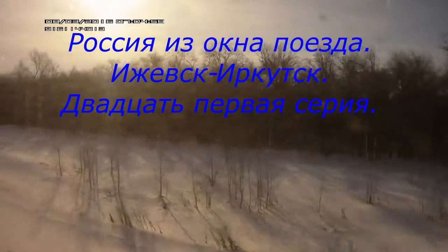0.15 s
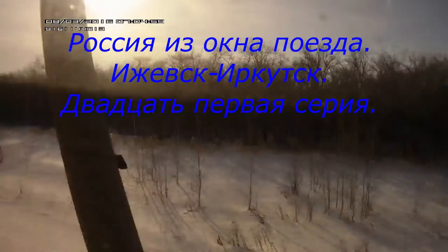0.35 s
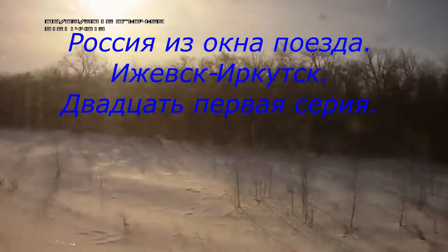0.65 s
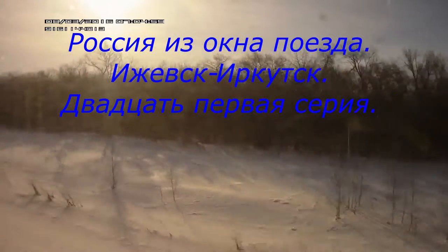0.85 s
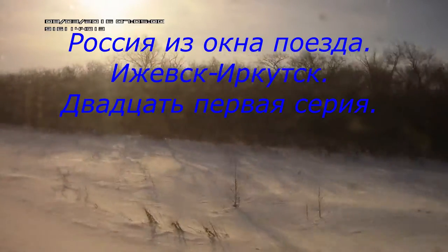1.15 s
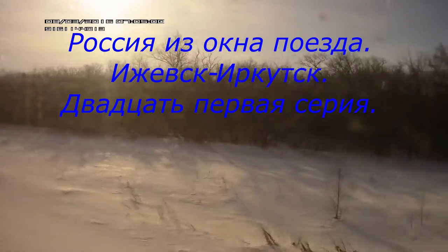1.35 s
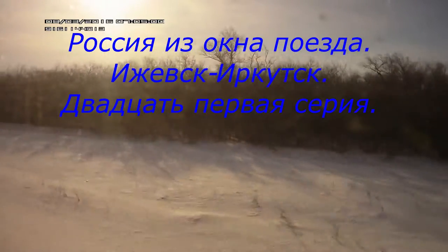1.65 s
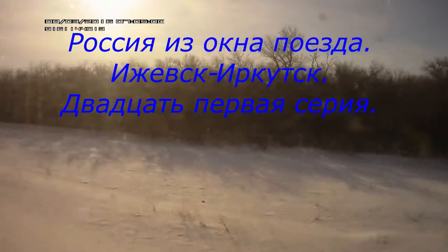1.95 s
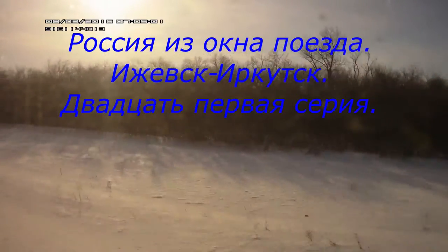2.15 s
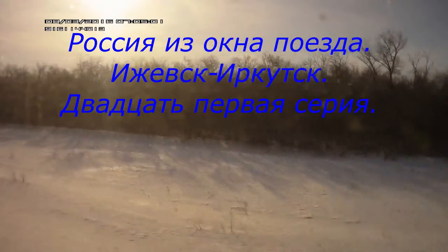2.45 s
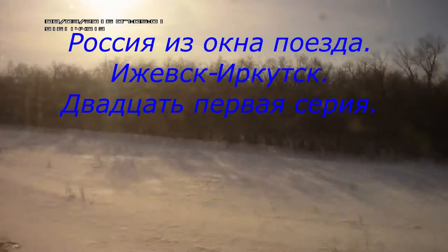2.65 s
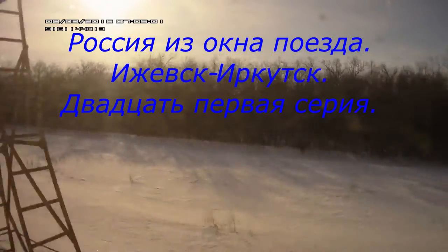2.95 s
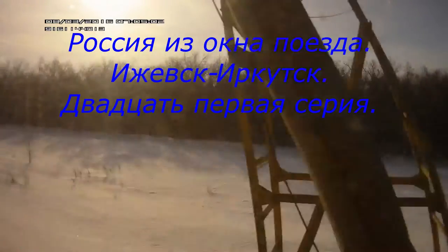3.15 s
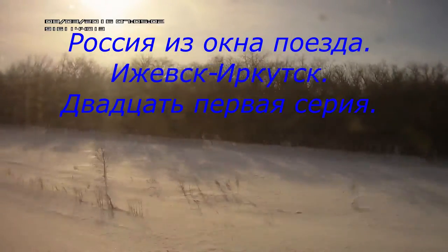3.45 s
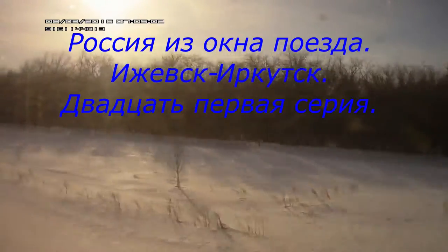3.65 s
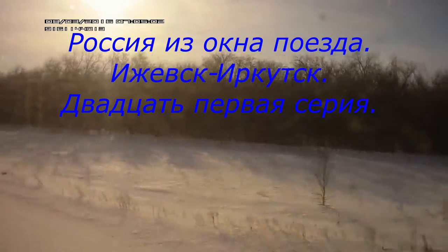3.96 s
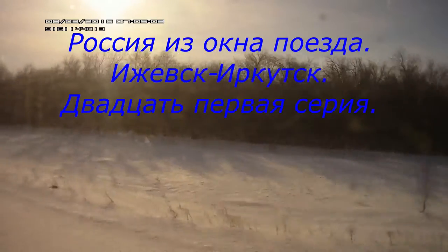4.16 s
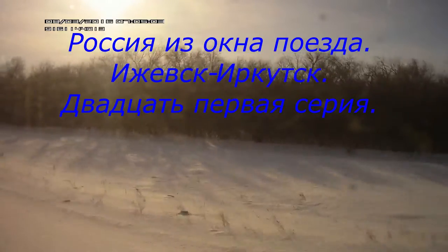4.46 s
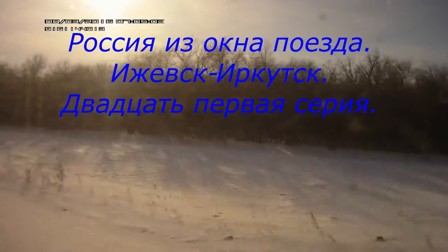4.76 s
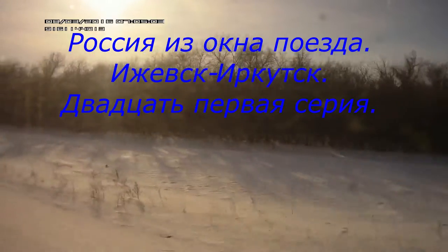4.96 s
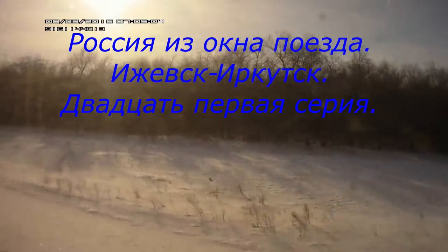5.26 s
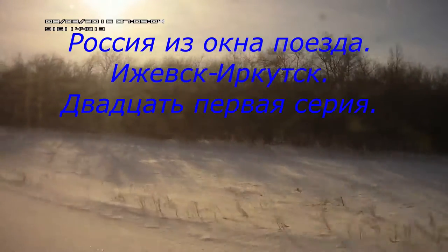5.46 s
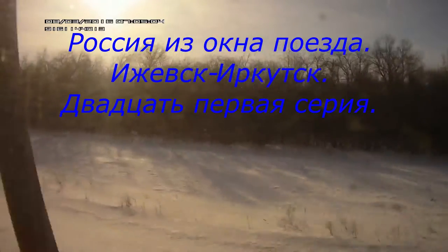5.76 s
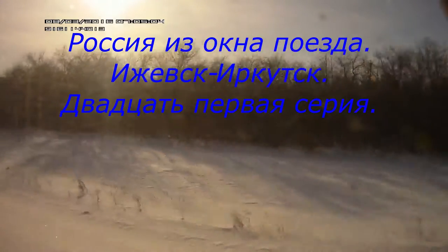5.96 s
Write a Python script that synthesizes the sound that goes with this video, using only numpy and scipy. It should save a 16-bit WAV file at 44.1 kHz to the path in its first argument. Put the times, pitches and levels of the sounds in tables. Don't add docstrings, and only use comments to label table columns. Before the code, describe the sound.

Inside a passenger carriage rolling steadily, the air booms very low in irregular swells while floor and walls rumble. Tiny metal fittings tinkle near the start, followed by one dull wheel thump. After about three seconds the wheels cross points with several uneven muffled thumps. A small camera's microphone adds soft hiss and faint rapid ticking.

```python
import sys
import numpy as np
from scipy import signal
from scipy.fft import rfft, irfft
from scipy.io import wavfile
from scipy.ndimage import uniform_filter1d

SR = 44100
rng = np.random.default_rng(int(sys.argv[2]) if len(sys.argv) > 2 else 0)


def dump_mix(stems):
    frames = np.atleast_2d(stems).T
    limited = np.clip(frames, -1, 1)
    pcm = np.round(limited * 32767).astype(np.int16)
    wavfile.write(sys.argv[1], SR, pcm)


def amplitude_ratio(level_db):
    exponent = np.asarray(level_db, float) / 20
    return 10 ** exponent


N = 269892
HZ = np.fft.rfftfreq(N, 1 / SR) + 1e-3


def rms_one(x):
    return x / np.sqrt(np.mean(x ** 2) + 1e-20)


def drift(rate_hz):
    return rms_one(irfft(rfft(rng.standard_normal(N)) / (1 + (HZ / rate_hz) ** 2), N))


def swelling(t, middle_s, length_s):
    return np.cos(np.pi * np.clip((t - middle_s) / length_s, -.5, .5))


def coloured(spectrum, modes, ref):
    hz, db = np.transpose(spectrum)
    shape = np.interp(np.log(HZ), np.log(hz), db, left=-99, right=-99)
    for mode_hz, width_hz, top_db in modes:
        shape = shape + top_db / (1 + (2 * (HZ - mode_hz) / width_hz) ** 2)
    bins = rfft(rng.standard_normal(N)) * amplitude_ratio(shape)
    in_ref = irfft(bins * (HZ > ref[0]) * (HZ < ref[1]), N)
    return irfft(bins, N) / np.std(in_ref)


def ring(clicks, hz, t60):
    radius = amplitude_ratio(-60 / (t60 * SR))
    turn = 2 * np.pi * hz / SR
    return signal.lfilter([0, np.sin(turn)], [1, -2 * radius * np.cos(turn), radius ** 2], clicks + 1e-18)


def strike(blows, modes, spread_db):
    at = [round(blow[0] * SR) for blow in blows]
    peak_db = np.array(blows)[:, 1]
    chance = rng.standard_normal((len(blows), len(modes)))
    out = 0
    for k, (hz, db, t60) in enumerate(modes):
        clicks = np.zeros(N)
        clicks[at] = amplitude_ratio(peak_db + db + spread_db * chance[:, k])
        out = out + ring(clicks, hz, t60)
    return out


def puffs(events, db_column, t60):
    clicks = np.zeros(N)
    at = [round(event[0] * SR) for event in events]
    clicks[at] = amplitude_ratio(np.array(events)[:, 1:db_column + 1].sum(axis=1))
    return signal.lfilter([1], [1, -amplitude_ratio(-60 / (t60 * SR))], clicks + 1e-18)


# middle [t/s], length [t/s], peak [level/dB], pitch [f/Hz]
LURCHES = [(.0, 0.13, -29, 36.4), (0.117, 0.21, -24, 36.75), (0.377, 0.32, -24, 35.55),
           (0.62, 0.12, -28, 36.5), (0.81, 0.19, -30, 37.9), (1.028, 0.18, -24.5, 35.73),
           (1.238, 0.16, -35.5, 33.07), (1.504, 0.45, -33, 34.1), (1.786, 0.28, -22, 34.47),
           (2.044, 0.23, -32.5, 31.7), (2.247, 0.2, -69, 29.2), (2.372, 0.58, -32, 30.59),
           (2.634, 0.22, -31, 32.98), (2.95, 0.22, -27.5, 35.13), (3.185, 0.14, -28.5, 40.65),
           (3.339, 0.098, -25, 38.36), (3.44, 0.093, -28.5, 35.9), (3.545, 0.14, -23, 34.4),
           (3.655, 0.17, -25, 34.4), (3.873, 0.12, -24.5, 33.3), (3.974, 0.14, -25.5, 33.47),
           (4.315, 0.38, -31.5, 41.9), (4.65, 0.37, -28.5, 34.12), (4.981, 0.23, -25.5, 33.66),
           (5.223, 0.33, -31, 33.7), (5.455, 0.22, -28.5, 35.64), (5.692, 0.2, -27.5, 33.42),
           (5.852, 0.2, -31.5, 36.96), (6.065, 0.19, -35, 39.7)]


def boom():
    t = np.arange(N) / SR
    middle, length, peak_db, pitch_hz = np.transpose(LURCHES)
    swell = amplitude_ratio(-46)
    for s, span, db in zip(middle, length, peak_db):
        swell = swell + amplitude_ratio(db) * swelling(t, s, span)
    swell = swell * amplitude_ratio(1.6 * drift(10))
    hz = np.interp(t, middle, pitch_hz) + 2.5 * drift(8)
    return -np.sqrt(2) * swell * np.cos(2 * np.pi * np.cumsum(hz) / SR)


# time [t/s], shaking [level/dB]
TRACK = [(0.0, -30.5), (0.03, -36.5), (0.43, -37), (1.77, -35.5), (2.84, -36.5), (2.9, -31.5), (3.1, -35),
         (3.14, -32.5), (3.41, -34), (3.44, -32), (3.85, -40), (3.9, -36.5), (4.75, -32), (4.77, -33.5),
         (5.03, -34.5), (5.18, -38), (5.57, -30), (6.12, -34)]
# frequency [f/Hz], density [level/dB per Hz]
FLOOR = [(7.1, -33), (12, -5), (27, 9), (43, 4), (65, -1.5), (102, -9), (170, -26), (220, -38), (370, -120)]
# frequency [f/Hz], density [level/dB per Hz]
WALLS = [(76, -25), (130, 1.5), (293, -1), (353, -4), (460, -9), (545, -8), (594, -13), (723, -10),
         (1000, -36), (1300, -27.5), (2200, -120)]
# centre [f/Hz], width [f/Hz], height [level/dB]
WALL_MODES = [(191.2, 22, -0.5), (262, 65, -1), (347.3, 15, 5), (397, 82, 6), (546, 20, 5.5),
              (640, 128, 4.5), (771.5, 82, 8)]
# frequency [f/Hz], density [level/dB per Hz]
RUSH = [(500, -30), (850, 0), (1020, -4), (1160, -8.5), (1230, -13.5), (1470, -16), (1700, -10),
        (1980, -14), (2540, -11.5), (3150, -16), (3400, -19), (3650, -29), (4400, -36), (6000, -70)]
# centre [f/Hz], width [f/Hz], height [level/dB]
RUSH_MODES = [(1170, 75, 2.), (1715, 90, 5.), (2185, 30, 4.), (2470, 200, 3.), (3200, 60, 2.5)]


def rolling():
    track_db = np.interp(np.arange(N) / SR, *np.transpose(TRACK))
    swing = track_db - track_db.mean()
    shake = drift(9.1)
    floor_db = 1.17 + track_db + 0.73 * shake
    walls_db = -42 + 0.25 * swing + 0.34 * shake + 0.5 * drift(6.4)
    rush_db = -59 + 0.15 * swing + 0.2 * shake + 0.6 * drift(5.3)
    floor = amplitude_ratio(floor_db) * coloured(FLOOR, [(34.9, 17.4, -20.0), (110, 23, 4.5)], ref=(50, 135))
    walls = amplitude_ratio(walls_db) * coloured(WALLS, WALL_MODES, ref=(150, 850))
    rush = amplitude_ratio(rush_db) * coloured(RUSH, RUSH_MODES, ref=(1500, 3400))
    return floor + walls + rush


# middle [t/s], length [t/s], peak [level/dB], pitch [f/Hz]
FLEXES = [(0.401, 0.12, -43, 96), (1.197, 0.11, -33.5, 96.8), (1.561, 0.12, -35.5, 107.4),
          (1.95, 0.19, -37.5, 111.8), (2.931, 0.13, -37.5, 101.3), (3.163, 0.086, -25.5, 89.5),
          (3.46, .12, -27.5, 85), (3.52, .14, -34, 110), (3.719, 0.11, -36.5, 100),
          (3.908, 0.093, -36.5, 139.3), (4.1, 0.083, -30.5, 55.6), (4.299, 0.13, -35, 106.4),
          (4.649, 0.19, -34.5, 94.8), (4.95, 0.13, -36, 107.3), (5.55, 0.14, -48, 62.3),
          (5.796, 0.13, -60, 55.7)]


def flexes():
    t = np.arange(N) / SR
    out = np.zeros(N)
    for s, span, db, hz in FLEXES:
        hum = np.cos(2 * np.pi * hz * (t - s))
        out = out + np.sqrt(2) * amplitude_ratio(db) * swelling(t, s, span) * hum
    return out


# time [t/s], peak [level/dB], brightness [level/dB]
THUMPS = [(0.525, -36.5, -28), (3.116, -32, -29.5), (3.131, -37, -30.5), (3.147, -33, -36),
          (3.489, -42, -25), (3.891, -38, -14), (3.905, -38, -33), (4.1, -43, -18), (4.165, -49, -21),
          (4.609, -35.5, -26), (4.74, -47, -26), (5.14, -39, -23), (5.625, -34, -34), (6.04, -45, -37)]
# frequency [f/Hz], strength [level/dB], t60 [t/s]
BOGIE = [(89.4, 3.5, 0.25), (183, 2, 0.15), (246, -0.5, 0.11), (370.3, 6, 0.1), (438, -2.5, 0.043),
         (530, 2, 0.045), (805, -9, 0.015), (1016, 1, 0.036)]


def thumps():
    blow = strike(THUMPS, BOGIE, spread_db=2.)
    springs = signal.butter(2, 700, fs=SR, output="sos")
    clack = coloured([(600, 0), (1500, -8), (4000, -24)], [], ref=(600, 4000))
    return amplitude_ratio(-3) * signal.sosfilt(springs, blow) + puffs(THUMPS, db_column=2, t60=.07) * clack


# time [t/s], peak [level/dB]
TINKS = [
    [(.1526, -62), (.168, -63), (.183, -67), (.197, -66), (.214, -70), (.2414, -65), (.3486, -73),
     (.362, -74), (.4943, -74), (.508, -73), (2.9662, -70), (6.046, -73)],
    [(.163, -63), (.19, -76), (.235, -76), (6.07, -73)],
    [(.787, -73)],
    [(.154, -74), (.1633, -72)],
    [(.165, -61), (.19, -61), (.21, -58), (.235, -59)],
]
# frequency [f/Hz], strength [level/dB], t60 [t/s]
FITTING = [
    [(8720, -11, .12), (8936, 0, .12), (9316, 0, .12), (9500, -9, .1), (9695, -6, .13), (10100, -12, .1)],
    [(5990, -11, .2), (7354, -13, .12), (8206, 3, .16), (13940, -16, .1)],
    [(9480, 0, .2)],
    [(4622, 0, .38), (5480, -9, .25)],
    [(1735, 0, .15), (2330, -3, .12), (2800, -3, .1), (3360, -9, .08)],
]
# time [t/s], peak [level/dB]
RATTLES = [(.2, -76), (.465, -72), (1.665, -72), (2.967, -70), (3.13, -70), (3.19, -71), (3.23, -72),
           (3.49, -68), (3.585, -68), (6.03, -68), (6.065, -68)]


def fittings():
    tinks = sum(strike(hits, modes, spread_db=2.) for hits, modes in zip(TINKS, FITTING))
    swell = signal.lfilter([.004], [1, -.996], puffs(RATTLES, db_column=1, t60=.2))
    trim = [(1500, 15.0), (3000, 15.5), (4200, 6), (5500, -10.0), (10000, -4)]  # (f/Hz, level/dB per Hz)
    return tinks + amplitude_ratio(1.5) * swell * coloured(trim, [], ref=(3600, 7000))


# frequency [f/Hz], density [level/dB per Hz]
HISS = [(2500, -3), (3500, -0.5), (4500, 1), (6000, -1), (8000, 0), (10000, -3), (12000, -5.5),
        (13500, -7.5), (14700, -10.5), (16000, -9.)]
# frequency [f/Hz], rms [level/dB]
WHINE = [(7558.5, -93), (7837.2, -86), (7897.1, -86)]


def camera():
    t = np.arange(N) / SR
    share = t * 30000 / 1001 % 1
    edge = .0007
    step_on = np.tanh((share - .9445) / edge)
    step_off = np.tanh((share - .9765) / edge)
    tick = amplitude_ratio(-48.5) * (step_on - step_off) / 2
    mid, side = (coloured(HISS, [(8130, 300, 2.3)], ref=(4500, 15000)) for _ in range(2))
    hiss = amplitude_ratio(-73) * amplitude_ratio(1.0 * drift(31)) * (mid + amplitude_ratio(-5) * side * [[1], [-.85]])
    whine = sum(np.sqrt(2) * amplitude_ratio(db) * np.sin(2 * np.pi * hz * t) for hz, db in WHINE)
    return hiss + tick + whine * amplitude_ratio([[.6], [-.6]])


# lower edge [f/Hz], threshold of a gap [spreads of chance]
TOP_BANDS = [(10400, -1.7), (11200, -1.3), (11900, -.9), (12500, -.5), (12900, 0), (13300, .1), (13700, .2),
             (14100, .3), (14500, .2), (15000, 1.5), (15600, 0)]


def gappy_top(x):
    bins, out = rfft(x), x
    for (low_hz, odds), (high_hz, _) in zip(TOP_BANDS, TOP_BANDS[1:]):
        band = irfft(bins * (HZ >= low_hz) * (HZ < high_hz), N)
        chance = drift(24)
        is_open = uniform_filter1d(1. * (chance > odds), size=250)
        kept = is_open * amplitude_ratio(3 * np.clip(chance + 1, 0, 2) - 2)
        out = out + (kept - 1) * band
    return out


def scene():
    car = boom() + flexes() + rolling()
    low_band = signal.butter(1, [90, 300], "band", fs=SR, output="sos")
    unlike = amplitude_ratio(-37) * np.roll(signal.sosfilt(low_band, car), 9000)
    return car + thumps() + fittings() * amplitude_ratio([[.8], [-.8]]) + unlike * [[1], [-1]]


def low_pass(x):
    return signal.sosfilt(signal.butter(12, 15100, fs=SR, output="sos"), x)


OFFSET = [
    [-.01926],
    [.01820],
]


def record(dry):
    mix = gappy_top(dry + camera()) + OFFSET
    return low_pass(mix)


dry = scene()
out = record(dry)
dump_mix(out)
```